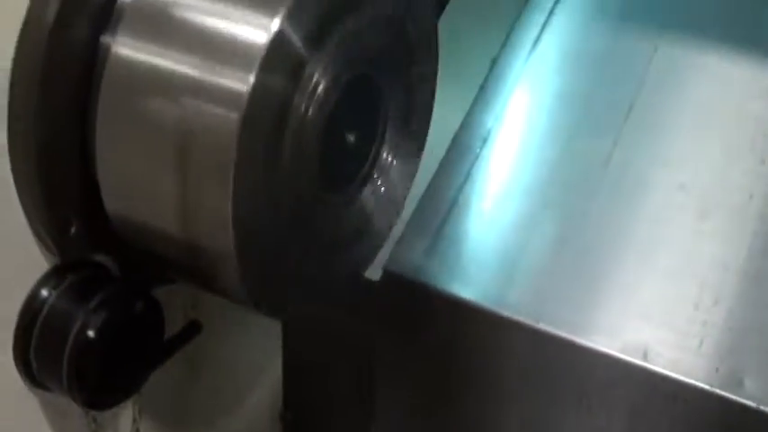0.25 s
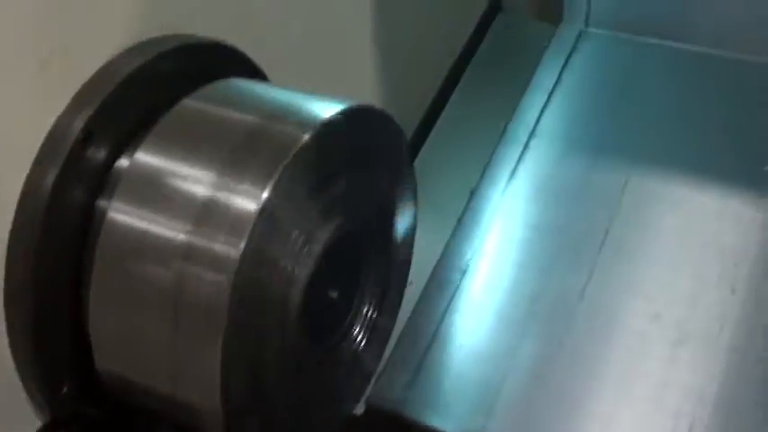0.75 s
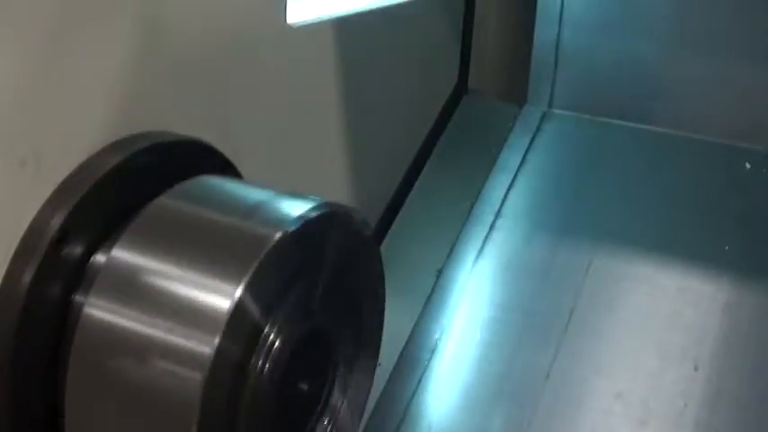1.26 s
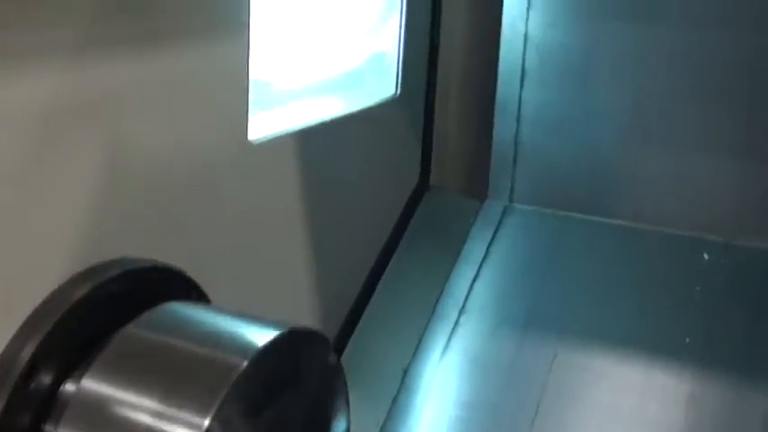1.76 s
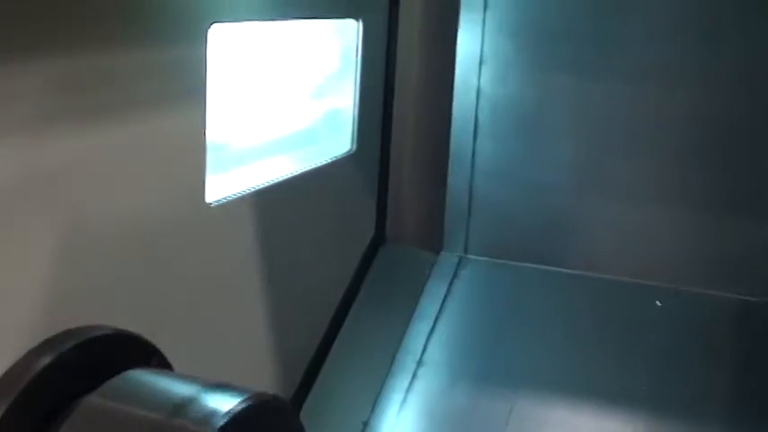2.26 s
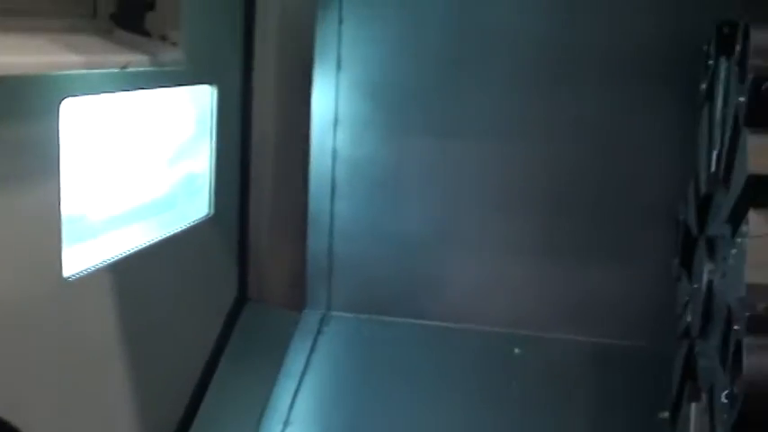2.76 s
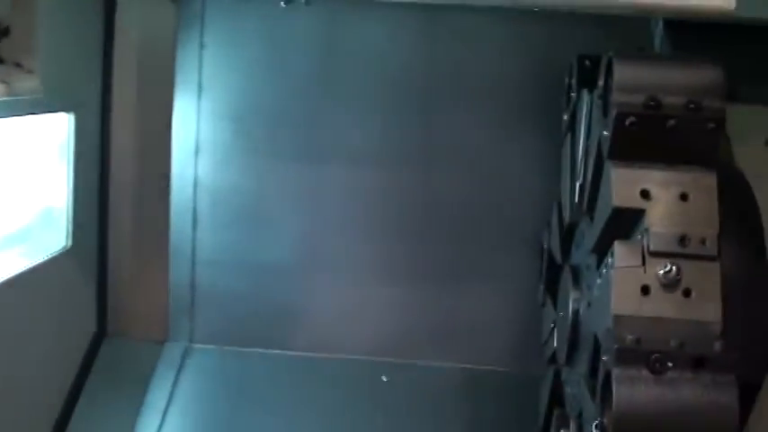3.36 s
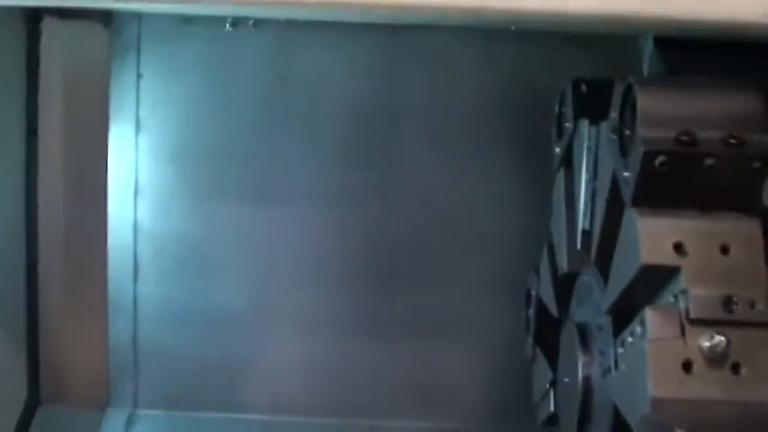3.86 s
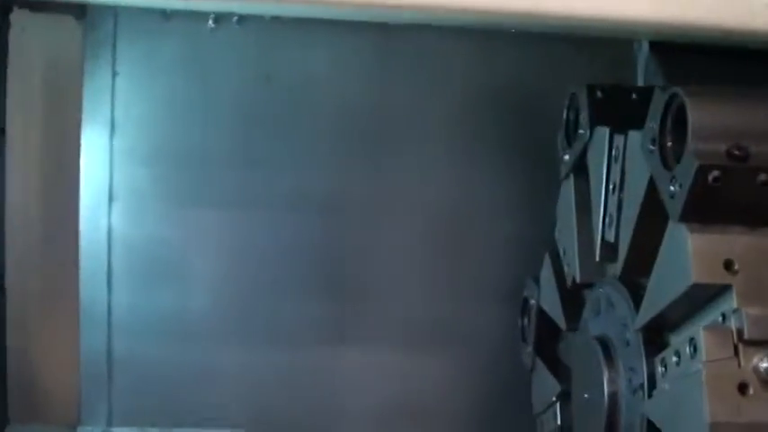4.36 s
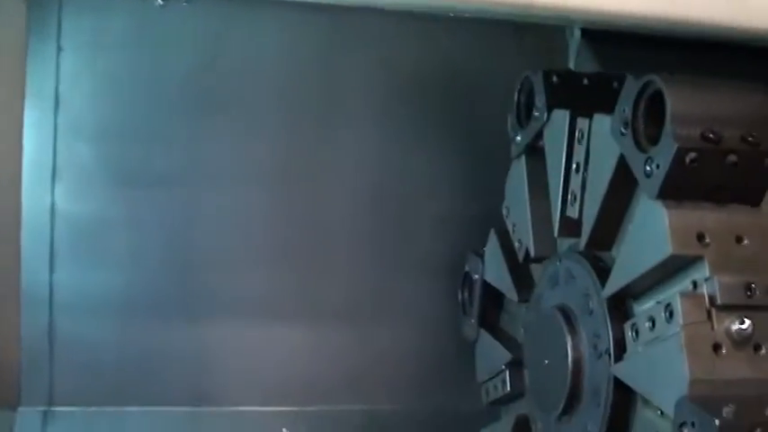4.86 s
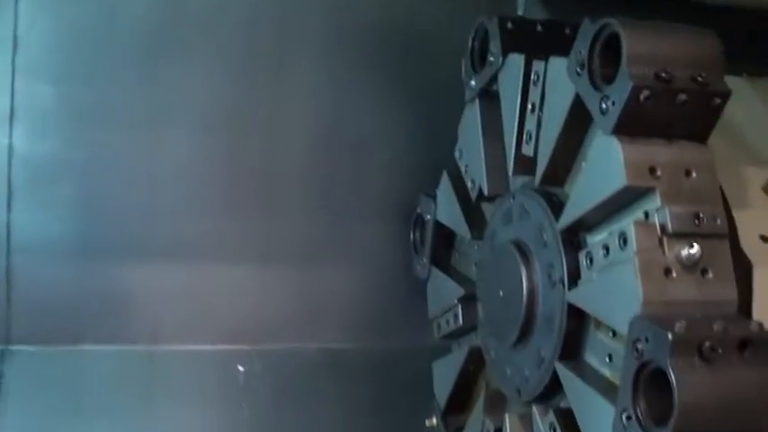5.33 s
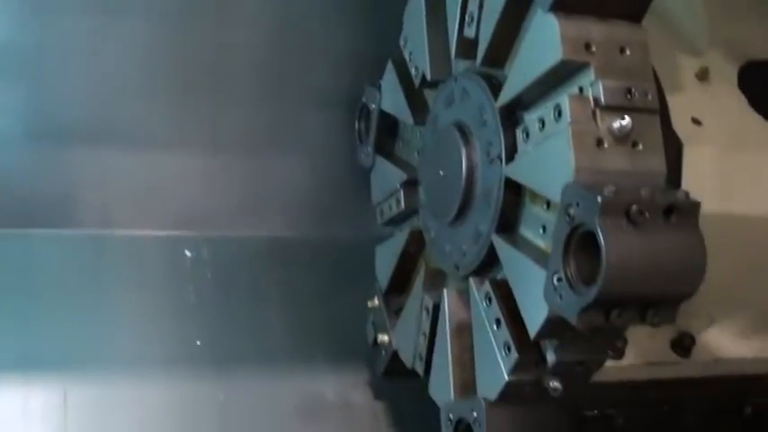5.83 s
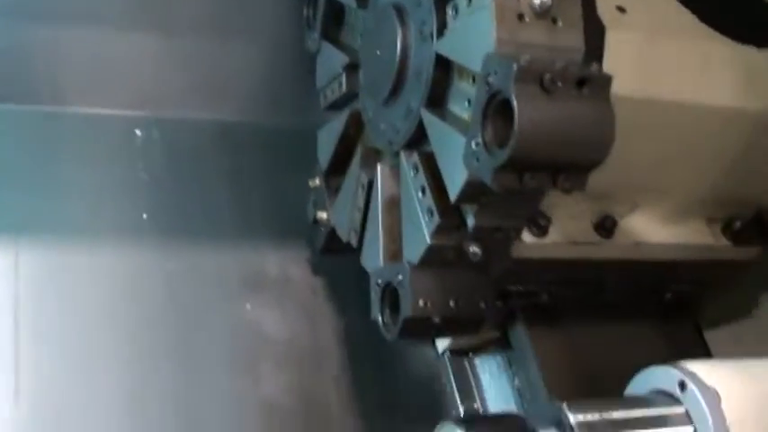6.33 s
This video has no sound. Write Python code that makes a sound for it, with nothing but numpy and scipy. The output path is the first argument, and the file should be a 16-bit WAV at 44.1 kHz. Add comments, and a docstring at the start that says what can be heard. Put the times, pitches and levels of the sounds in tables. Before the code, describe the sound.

Inside a running lathe enclosure, a pure pump whine rises over fan drone and hissing oil, drops away past midway, partly returns and weakens.

```python
"""An idling CNC lathe heard from a small stereo microphone carried slowly through its open steel enclosure.
Throughout, fan and motor tones hum at fixed pitch over rushing air and oil, made as shaped noise.
The pump whine, a sine at the second of its harmonics, swells to about 3.8 s and dips sharply near 4.5 s;
the pump fundamental peaks near 4.2 s. The whine then partly recovers and fades unevenly to the end.
Standing waves between the panels raise and lower the tones: level curves, and slow random drift on some."""
import sys
import numpy as np
from scipy import signal
from scipy.fft import rfft, irfft
from scipy.io import wavfile
from scipy.ndimage import map_coordinates

SR = 44100
rng = np.random.default_rng(int(sys.argv[2]) if len(sys.argv) > 2 else 0)


def inscribe(sig):
    """Save sig as 16-bit PCM at rate SR to the path in sys.argv[1].

    A 1-D sig is mono; a 2-D sig holds one channel per row.
    Samples are clipped to [-1, 1] before scaling.
    """
    pcm = np.round(np.clip(np.atleast_2d(sig).T, -1, 1) * 32767)
    wavfile.write(sys.argv[1], SR, pcm.astype(np.int16))


N = 290619


def amp(db):
    """Decibels to gain."""
    return 10 ** (np.asarray(db) / 20)


def in_time(rows):
    """Table columns after time [s], one value per sample."""
    time_s, *columns = np.transpose(rows)
    sample_s = np.arange(N) / SR
    return [np.interp(sample_s, time_s, column) for column in columns]


def over_hz(rows):
    """Table columns after frequency [Hz], one value per FFT bin, joined on a log axis."""
    hz, *columns = np.transpose(rows)
    log_bin_hz = np.log(np.fft.rfftfreq(N, 1 / SR) + 1)  # +1 keeps the log finite at DC
    return [np.interp(log_bin_hz, np.log(hz), column) for column in columns]


def drift(corner_hz):
    """Slow random curve of spread 1: white draws through a two-pole lowpass."""
    hop, settle = 220, 2000  # samples per draw; draws discarded
    steps = N // hop + 2
    pole = np.exp(-2 * np.pi * corner_hz * hop / SR)
    draws = rng.standard_normal(steps + settle)
    slow = signal.lfilter([1], [1, -2 * pole, pole * pole], draws)[settle:]
    unit_gain = np.sqrt((1 - pole * pole) ** 3 / (1 + pole * pole))
    return np.interp(np.arange(N) / hop, np.arange(steps), slow * unit_gain)


def tone(hz, rms_db, waver_db=0, waver_hz=0.98, start_turns=None):
    """Sine at fixed pitch; its level drifts by waver_db of spread as standing waves pass."""
    if start_turns is None:
        start_turns = rng.random()
    turns = hz * np.arange(N) / SR + start_turns
    level_db = rms_db + waver_db * drift(waver_hz)
    return np.sqrt(2) * amp(level_db) * np.sin(2 * np.pi * turns)


def beating(hz, rms_db, neighbours):
    """A tone plus its close neighbours; each pair throbs at its difference in pitch."""
    start = rng.random()
    out = tone(hz, rms_db, start_turns=start)
    for near_hz, in_step_s, first_db, last_db in neighbours:
        near_start = start + (hz - near_hz) * in_step_s
        out += tone(near_hz, np.linspace(first_db, last_db, N), start_turns=near_start)
    return out


def coloured(spectrum_db_per_hz):
    """Gaussian noise shaped to a given level per Hz."""
    white = rfft(rng.standard_normal(N))
    return irfft(white * amp(spectrum_db_per_hz) * np.sqrt(SR / 2), N)


def panels(x, echo_db):
    """Echoes off the enclosure panels; their delays creep as the microphone moves and comb the noise."""
    now, out = np.arange(N), x.copy()
    delays_s = (.0023, .0037, .0059, .0083, .0127, .0191)
    for delay_s in delays_s:
        lag = SR * (delay_s + .0003 * drift(.4))
        out += amp(echo_db) * map_coordinates(x, [now - lag], order=2, mode="grid-wrap")
    return out / np.sqrt(1 + len(delays_s) * amp(echo_db) ** 2)  # holds the power


# scattered noise: (frequency [Hz], level re direct noise [dB])
SCATTER = [(30, -26), (100, -32), (400, -30), (900, -18), (1300, -11), (2100, -20), (3300, -18),
           (4500, -11), (6500, -9)]


def flow_noise(spectrum, walk_db, echo_db):
    """Turbulent flow: direct noise with panel echoes, and independent scattered noise."""
    level_db, = over_hz(spectrum)
    scatter_db, = over_hz(SCATTER)
    direct = panels(coloured(level_db), echo_db)
    scattered = coloured(level_db + scatter_db)
    return amp(walk_db) * np.array([direct, scattered])


# fan air spectrum before walk gain: (frequency [Hz], level [dB/Hz])
AIR_SPECTRUM = [(20, -86), (40, -76), (57, -64.5), (72, -66.5), (105, -61.5), (190, -55.5), (285, -53.5),
                (355, -54), (405, -63.5), (620, -57.5), (720, -60.5), (980, -60), (1300, -73.5),
                (3000, -140)]
# noise gain along the walk: (time [s], air [dB], oil [dB])
WALK_GAIN = [(0, 1, 1), (1.6, -1.5, 0), (3.3, -1.5, 0), (4.2, 0, .5), (4.7, -1, 0), (5.5, 0, 1.5),
             (6.59, -0.5, .5)]


def air():
    """Air rush of the fans: low broadband flow noise."""
    air_db, _ = in_time(WALK_GAIN)
    return flow_noise(AIR_SPECTRUM, air_db, echo_db=-14)


# oil hiss spectrum before walk gain: (frequency [Hz], level [dB/Hz])
OIL_SPECTRUM = [(900, -90.5), (1300, -74.5), (1500, -72), (2150, -69), (2400, -72.5), (2780, -82),
                (3080, -72.5), (3330, -72.5), (3550, -80.5), (4300, -90.5), (4800, -89.5), (6200, -99),
                (7200, -108), (9000, -135)]


def oil():
    """Oil through the valves: flow noise in a higher band."""
    _, oil_db = in_time(WALK_GAIN)
    return flow_noise(OIL_SPECTRUM, oil_db, echo_db=-15)


# other motor tones before drift: (frequency [Hz], level [dB])
HUMS = [(126.5, -49), (182.5, -53), (244.5, -42), (261.1, -44), (288.6, -42), (291.7, -46), (295.4, -46),
        (298.3, -43), (343.8, -40), (360.2, -45), (446.5, -54), (476, -50), (497.3, -43), (514, -46),
        (542.3, -48), (623.8, -51), (632, -50), (687.6, -52), (750.1, -48), (758.4, -50), (766.9, -48),
        (833.2, -50), (862.9, -50), (876.6, -48), (922.6, -54), (1031, -55), (1129.2, -53), (1145.9, -56),
        (1258.2, -60), (1390.3, -59), (1574.6, -61), (2516.4, -57), (3353.4, -64), (5032.7, -82)]


def motors():
    """Other motors: sines at fixed pitch, each drifting in level on its own."""
    return sum(tone(hz, db, waver_db=2.5, waver_hz=.8) for hz, db in HUMS)


FAN_HZ = 106.795
# second harmonic: (first level [dB], last level [dB])
FAN_SECOND = (-36, -33.5)
# tones beating with it: (frequency [Hz], in step at [s], first level [dB], last level [dB])
FAN_NEIGHBOURS = [(215.67, 2.05, -47, -46), (215.27, 2.01, -48, -48), (218.99, .083, -53, -42)]
# upper harmonics: (time [s], third [dB], fourth [dB], fifth [dB])
FAN_UPPER = [(0, -36.5, -40.5, -39.5), (3.2, -39, -42.5, -39.5), (4.0, -41, -37.5, -37),
             (4.7, -48, -36.5, -36), (5.8, -51, -35.5, -40), (6.59, -48, -37, -51)]
# weak harmonics before drift: (harmonic number [-], level [dB])
FAN_WEAK = [(1, -49), (6, -46), (7, -49)]


def fan():
    """Blade-passing harmonics of the cooling fan; the second beats with close tones."""
    second = beating(2 * FAN_HZ, np.linspace(*FAN_SECOND, N), FAN_NEIGHBOURS)
    upper = sum(tone(k * FAN_HZ, db) for k, db in enumerate(in_time(FAN_UPPER), start=3))
    weak = sum(tone(round(k) * FAN_HZ, db, waver_db=3.0) for k, db in FAN_WEAK)
    return second + upper + weak


PUMP_HZ = 386.82
PUMP_WAVER_DB, PUMP_WAVER_HZ = 3, 1.5
# whine, second harmonic: (time [s], level [dB])
WHINE = [(0, -22), (.3, -21.5), (.88, -18), (1.95, -15), (2.6, -15), (3.27, -15), (3.82, -13),
         (4.05, -15.5), (4.3, -18.5), (4.53, -27.5), (4.81, -22.5), (5.54, -22), (5.8, -24.5), (5.97, -23),
         (6.24, -25), (6.59, -28)]
# fundamental: (time [s], level [dB])
PUMP_FIRST = [(0, -31), (3, -30.5), (4.2, -23.5), (5.2, -28.5), (6.59, -30)]
# tones beating with the fundamental: (frequency [Hz], in step at [s], first level [dB], last level [dB])
PUMP_NEIGHBOURS = [(387.52, 1.0, -34.5, -36), (379.19, .037, -31, -35), (370.86, .029, -38, -37)]
# high harmonics before drift: (harmonic number [-], level [dB])
PUMP_HIGH = [(3, -52), (4, -56), (5, -54), (6, -59), (7, -65), (9, -63), (10, -67), (11, -78), (12, -78)]


def pump():
    """Piston pressure pulses: a harmonic series, mostly led by the second; the fundamental beats."""
    whine = tone(2 * PUMP_HZ, *in_time(WHINE))
    first = beating(PUMP_HZ, *in_time(PUMP_FIRST), PUMP_NEIGHBOURS)
    high = sum(tone(round(k) * PUMP_HZ, db, PUMP_WAVER_DB, PUMP_WAVER_HZ) for k, db in PUMP_HIGH)
    return whine + first + high


# microphone ports: (frequency [Hz], left lag [rad], left-right level [dB])
PORTS = [(20, .03, .1), (100, .14, .3), (200, .3, .6), (400, .5, .7), (750, .5, 1.2), (1100, .45, 2.6),
         (1450, .62, .9), (2300, .2, .1), (3100, .28, .1), (4400, .01, -1), (6000, 0, -.8), (8000, 0, 0)]


def scene():
    """Direct sound reaches two ports with lag and balance set by pitch; scatter is opposite in sign."""
    direct, scattered = air() + oil()
    direct += motors() + fan() + pump()
    lag_rad, balance_db = over_hz(PORTS)
    side = np.array([[1], [-1]])  # left, right
    ports = amp(side * balance_db / 2) * np.exp(-.5j * side * lag_rad)
    half = 4096  # samples each side of the response centre
    centred = np.fft.fftshift(irfft(ports, N), axes=1)
    response = centred[:, N // 2 - half:N // 2 + half + 1]
    running = np.pad(direct, half, "reflect", reflect_type="odd")  # sound goes on past both ends
    return signal.fftconvolve(running[None], response, "valid", axes=1) + side * scattered


SELF_NOISE_DB_PER_HZ, CUTOFF_HZ = -100.1, 15700


def record(dry):
    """The preamplifier adds flat hiss, alike in both channels; a zero-phase lowpass cuts the top."""
    hiss = amp(SELF_NOISE_DB_PER_HZ) * np.sqrt(SR / 2) * rng.standard_normal(N)
    cut = signal.ellip(14, .1, 40, CUTOFF_HZ, fs=SR, output="sos")  # ripple, stopband [dB] per pass
    return signal.sosfiltfilt(cut, dry + hiss)


dry = scene()
out = record(dry)
inscribe(out)
```